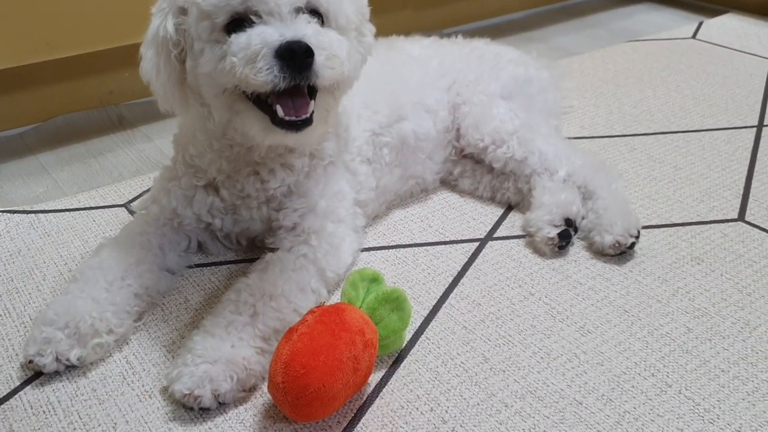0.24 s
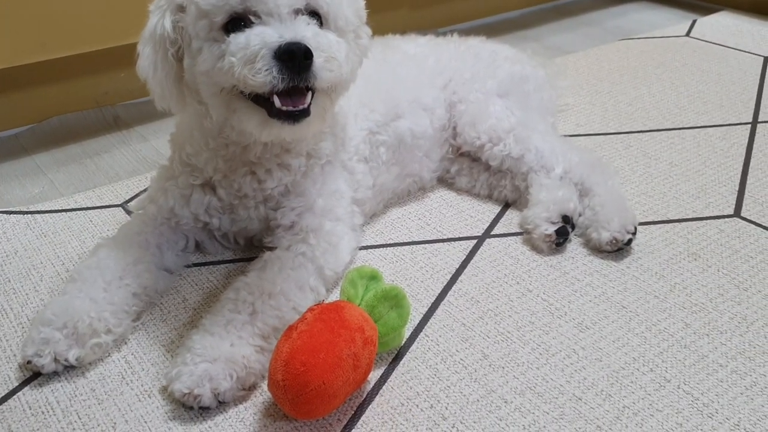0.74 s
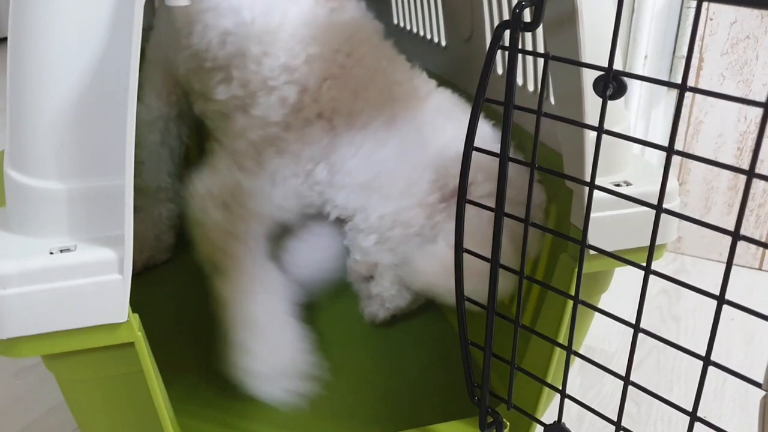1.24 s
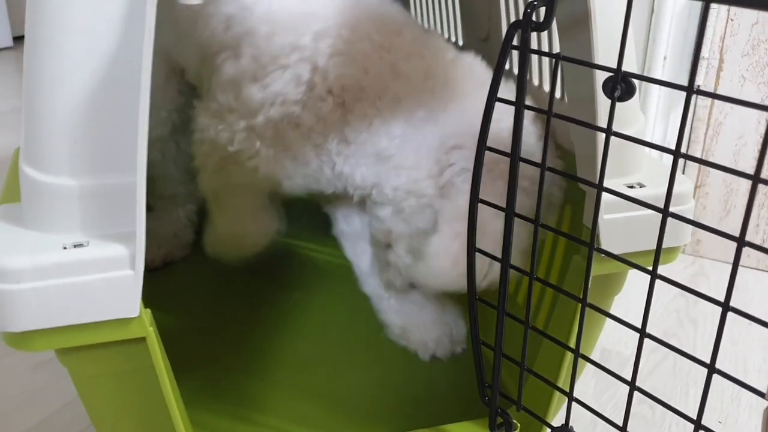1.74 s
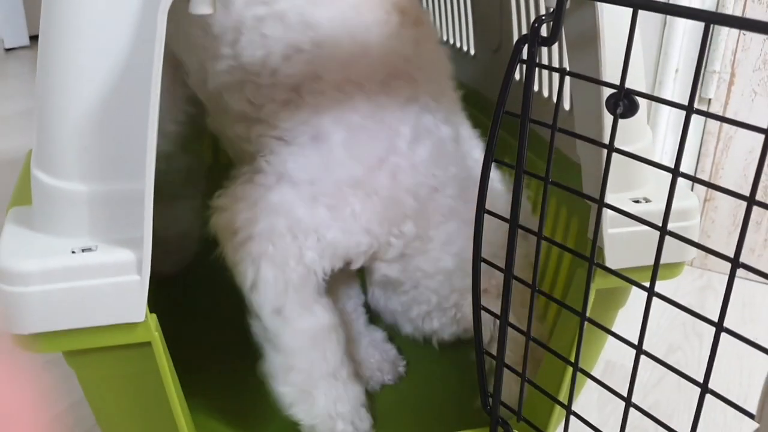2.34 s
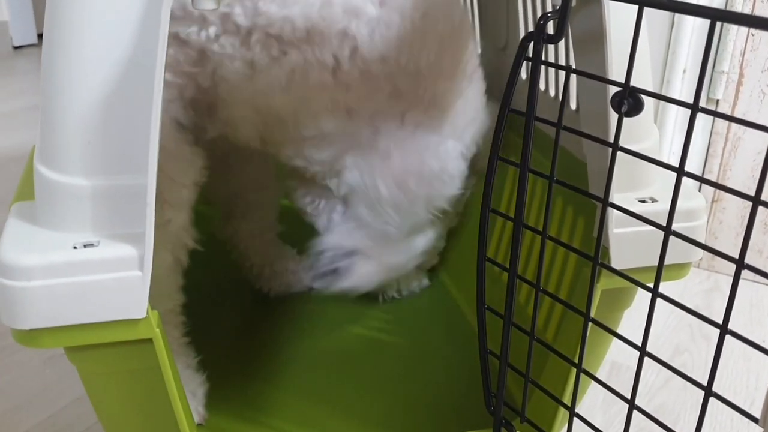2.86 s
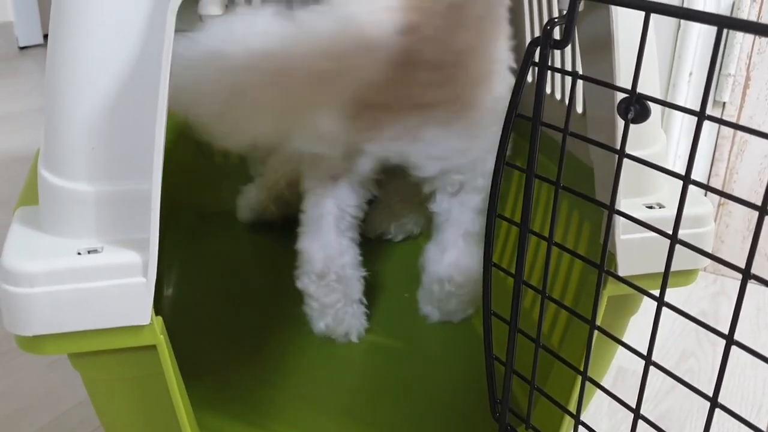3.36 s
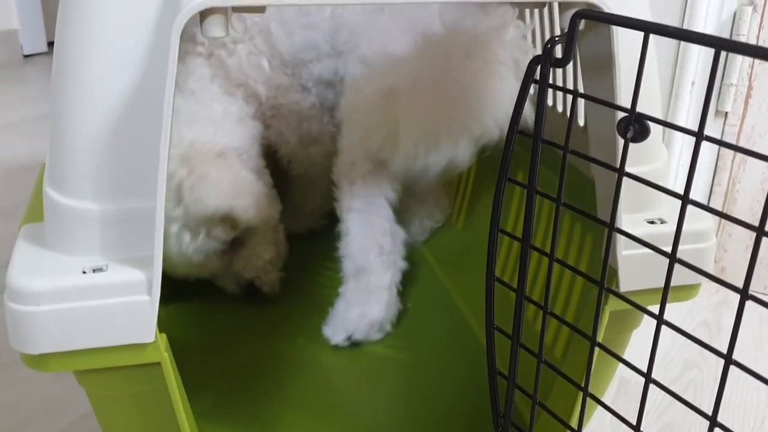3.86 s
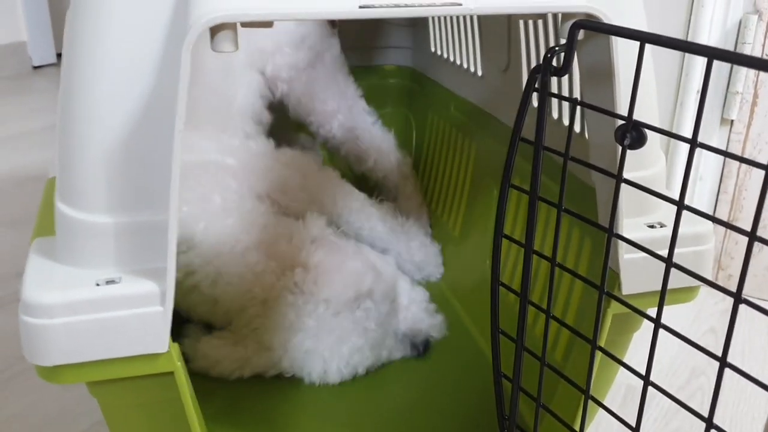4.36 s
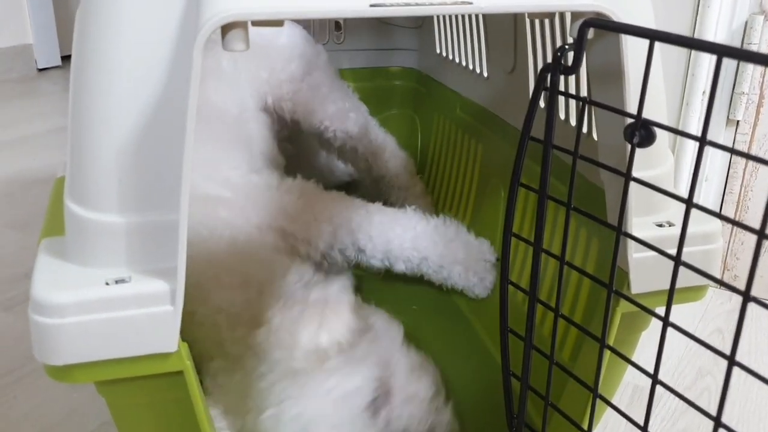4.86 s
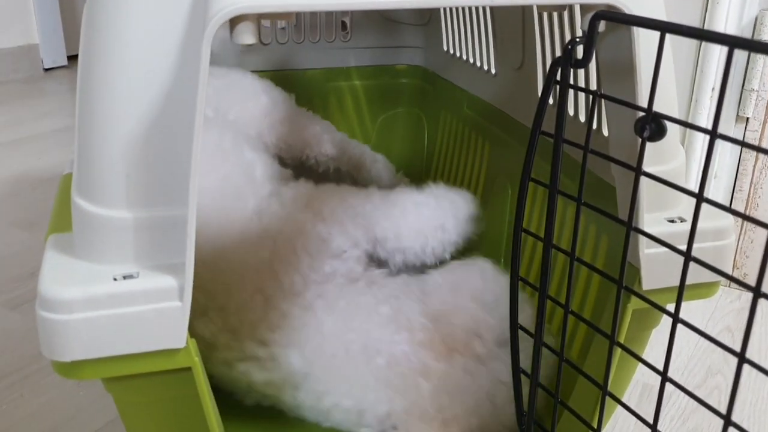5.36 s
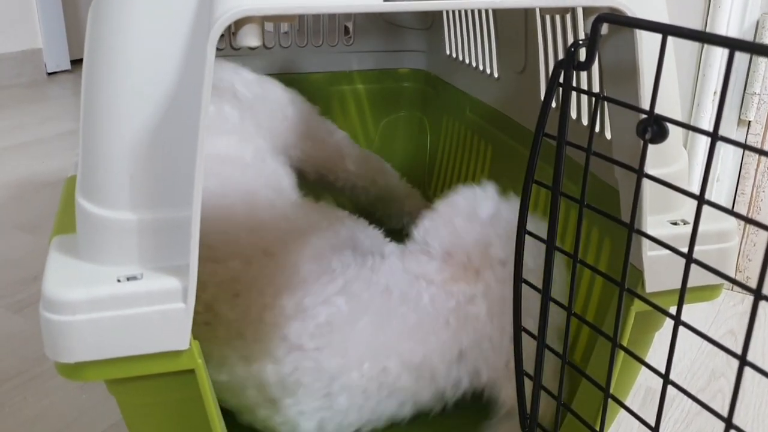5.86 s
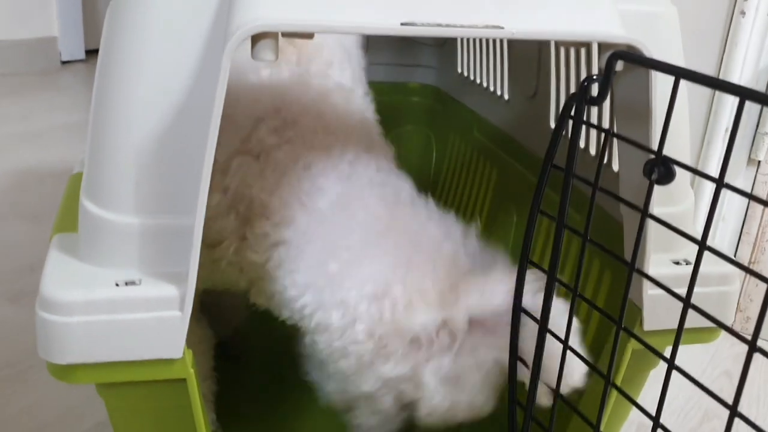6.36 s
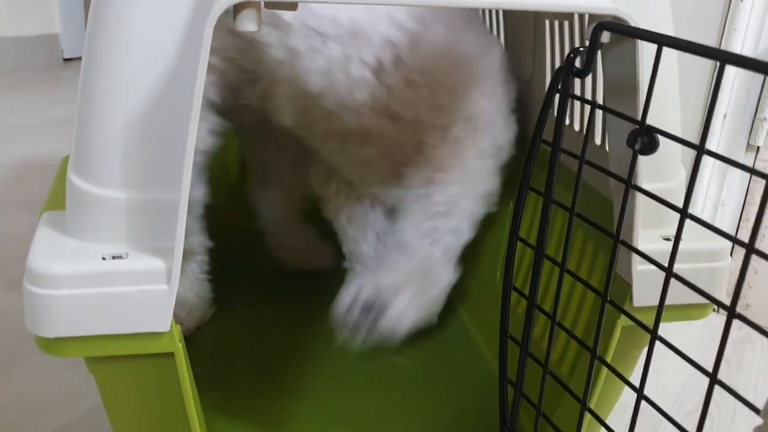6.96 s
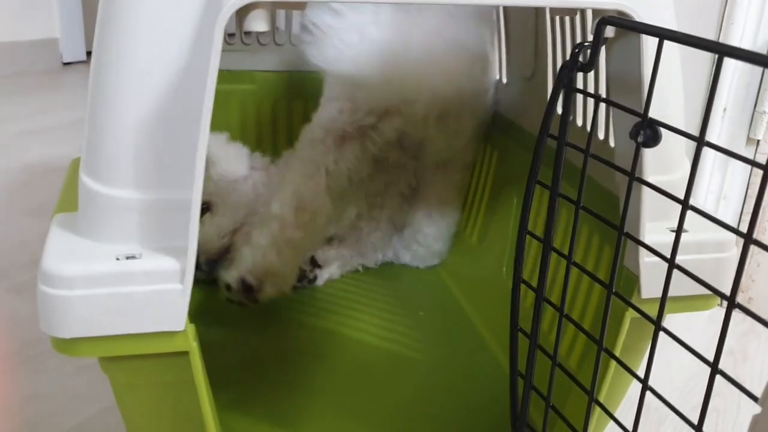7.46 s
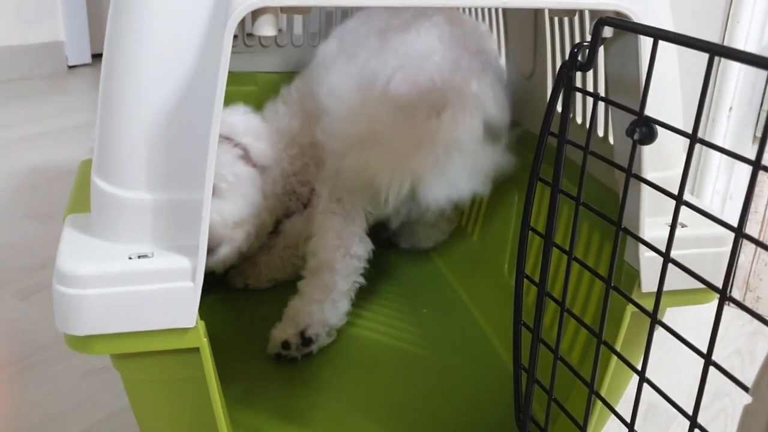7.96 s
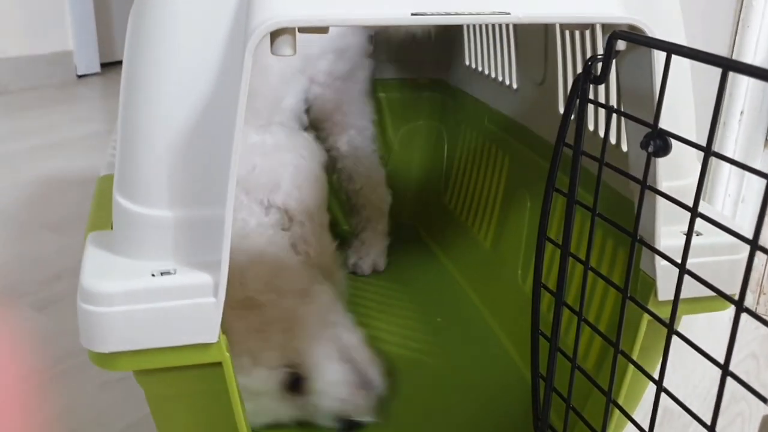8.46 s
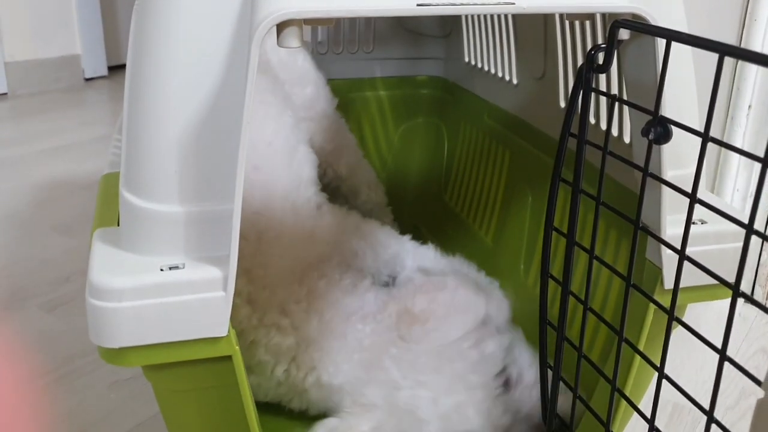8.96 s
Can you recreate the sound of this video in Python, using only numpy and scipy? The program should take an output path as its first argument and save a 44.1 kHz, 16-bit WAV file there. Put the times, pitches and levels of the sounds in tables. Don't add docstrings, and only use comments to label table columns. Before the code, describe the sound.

From 0 to about 0.9 seconds there is only a soft, low, steady indoor hum, which fades to a brief silence. At 1.03 the carrier bursts in, loud and close: a small dog digs at the ribbed plastic floor, roughly one stroke every 0.12 seconds until about 2.4, each a bright claw scratch with a round low paw thump and hollow shell rumble, loudest around 1.8. From 2.5 to 2.9 come strong separate clacks and skids. Between 3 and 5.3 steps grow sparser, with dull taps, a cluster of wall bumps and scraping near 4.2 to 4.3. It is quieter until 6, with fur slides; a hard step and body thump land near 6.7. From 7 to 8 there are rasps, taps and shuffling, then light brushes and a flurry of small claw rasps from 8.6 to 9.2. The room adds a short tail.

```python
import sys
import numpy as np
from scipy import signal
from scipy.fft import rfft, irfft, next_fast_len
from scipy.io import wavfile

SR = 44100
rng = np.random.default_rng(int(sys.argv[2]) if len(sys.argv) > 2 else 0)


def generate_wav(signal):
    frames = np.transpose(np.atleast_2d(signal))
    scaled = np.clip(frames, -1, 1) * 32767
    pcm = np.round(scaled).astype(np.int16)
    wavfile.write(sys.argv[1], SR, pcm)


def invert_db(level):
    return 10 ** (np.asarray(level, dtype=float) / 20)


N = 406161
SIZE = next_fast_len(N + SR)
HZ = np.maximum(np.fft.rfftfreq(SIZE, 1 / SR), 1)

# (f/Hz, level/dB)
CLAW_COLOUR = [(180, -28), (300, 0), (519, -9), (1840, -7), (2250, -5), (2930, -0.5), (3700, -3),
               (6100, -1), (8940, -17.5), (12900, -11), (15200, -26), (16600, -20)]
# (f/Hz, phase/rad)
PORT_PHASE = [(60, 0), (150, .22), (300, .75), (700, 1.0), (1500, 2.1), (2700, 1.3), (15000, 1.6)]
# (t/s, peak level/dB)
DIG_THUMPS = [(1.115, -13.5), (1.2318, -9), (1.289, -20.5), (1.341, -11), (1.454, -12), (1.57, -13.5),
              (1.681, -11.5), (1.81, -7.5), (1.915, -8), (2.034, -9), (2.152, -8), (2.376, -25)]


def rms_one(x):
    return x / np.sqrt(np.mean(x ** 2) + 1e-20)


def in_time(rows):
    s, *columns = np.transpose(rows)
    return [np.interp(np.arange(N) / SR, s, c) for c in columns]


def at_hz(points):
    hz, value = np.transpose(points)
    return np.interp(np.log(HZ), np.log(np.maximum(hz, 1)), value)


def colour(x, spectrum):
    cepstrum = irfft(np.log(invert_db(at_hz(spectrum))), SIZE)
    cepstrum[1:SIZE // 2] *= 2
    cepstrum[SIZE // 2 + 1:] = 0
    return irfft(rfft(x, SIZE) * np.exp(rfft(cepstrum)), SIZE)[..., :N]


def band(x, low_hz, high_hz):
    sos = signal.butter(2, [low_hz, min(high_hz, .45 * SR)], "band", fs=SR, output="sos")
    return signal.sosfilt(sos, x)


def ring(clicks, hz, t60):
    r, w = invert_db(-60 / (t60 * SR)), 2 * np.pi * hz / SR
    return signal.lfilter([0, np.sin(w)], [1, -2 * r * np.cos(w), r * r], clicks + 1e-18)


def drift(rate):
    knots = rng.standard_normal(1000)
    return np.interp(np.arange(N) / SR * rate, np.arange(1000), knots)


def diffuse(length):
    # (f/Hz, correlation)
    likeness = [(60, 0.99), (165, 1.02), (260, 0.6), (550, 0.09), (1650, -0.42), (4970, -0.09),
                (15000, 0.08)]
    mid, side = rfft(rng.standard_normal((2, length)), SIZE)
    alike = np.clip(at_hz(likeness) - .06, 0, 1)
    return np.sqrt(1 + alike) * mid + np.sqrt(1 - alike) * side * [[1], [-1]]


def hum():
    # (f/Hz, level/dB)
    hum_colour = [(12, -76), (20, -41.5), (93, 2.5), (134, -13), (168, -10.5), (204, -13), (328, -16.5),
                  (357, -11), (542, -19), (660, -27), (849, -21), (976, -30.5), (1060, -25), (1330, -30.5),
                  (4000, -46.5), (8000, -63), (16000, -74)]
    # (t/s, level/dB)
    hum_level = [
        (0, -39.5),
        (.75, -38.5),
        (.85, -41),
        (.9, -44.5),
        (.928, -57),
        (1.028, -42.5),
        (9.21, -40),
    ]
    noise = irfft(diffuse(SIZE) * invert_db(at_hz(hum_colour)), SIZE)[:, :N]
    return invert_db(in_time(hum_level)[0]) * rms_one(noise)


def rumble(lumpy_db=3.5):
    # (f/Hz, level/dB)
    rumble_colour = [(15, -58), (25, -22.5), (66, -2), (128, -0.5), (186, -24.5), (224, -1), (378, -22),
                     (574, -39.5), (793, -15), (1000, -26), (1300, -59), (2200, -120)]
    # (t/s, level/dB)
    weight = [(1.03, -34.5), (1.15, -24), (1.3, -26.5), (2.03, -24.5), (2.35, -29.5), (2.6, -47),
              (2.78, -31), (3.2, -44), (3.5, -38.5), (4.0, -34.5), (4.15, -36.5), (4.58, -39), (6.04, -41),
              (6.43, -36), (6.75, -39.5), (7.3, -35), (8.07, -35), (9.21, -38.5)]
    level_db, = in_time(weight)
    shudder = colour(rng.standard_normal(N), rumble_colour)
    return invert_db(level_db - 5.0 + lumpy_db * drift(18)) * rms_one(shudder)


def strikes():
    # (t/s, peak level/dB, struck panel f/Hz, dull knock/dB re peak, sharp edge/dB re peak)
    dig_strokes = [(1.104, -19, 2640, -10, -3.5), (1.1429, -17, 2820, -19, -9), (1.216, -15, 6400, -35, -9),
                   (1.333, -15, 2920, -16, -1.5), (1.44, -15.5, 2600, -26, -10),
                   (1.566, -12.5, 2800, -33, -7), (1.7035, -14, 3160, -13, -9),
                   (1.7937, -7.5, 3070, -16, -13), (1.8975, -9.5, 3480, -13, -22.5),
                   (1.912, -40, 4500, -9, 5), (2.0288, -14.5, 2880, -24, -6.5),
                   (2.1358, -11, 3420, -19, -14), (2.263, -15.5, 4440, -12, -7),
                   (2.3903, -16, 2460, -12, -14), (2.408, -25.5, 3000, -12, -17)]
    # (t/s, peak level/dB, panel f/Hz, knock/dB, edge/dB)
    steps = [(2.5511, -6.5, 2520, -17, -23), (2.6299, -17, 2650, -57, -18), (2.7632, -12, 2900, -30, -9),
             (2.8811, -5.5, 2520, -31, -19.5), (3.2412, -15, 2820, -11, -9.5),
             (3.4069, -18.5, 3220, -16.5, -25.5), (3.7275, -12.5, 1550, -36, -18),
             (4.0066, -13.5, 2420, -14.5, -24.5), (4.3334, -19, 1410, -7.5, -18.5),
             (4.4425, -18, 2740, -13, -11), (4.7867, -19.5, 5800, -8.5, -0.5),
             (5.1163, -22, 4380, -8.5, -2.5), (5.2602, -16, 2900, -62, -11),
             (6.358, -24.5, 2640, -10, -6.5), (6.6547, -8.5, 1020, -11, -18.5),
             (6.6985, -17, 2980, -7.5, -7), (6.9155, -28.5, 3440, -5.5, 1.5), (7.2814, -14, 2420, -51, -12),
             (7.4212, -20, 1580, -8.5, -9), (7.7945, -27.5, 3220, -4, -7),
             (8.3298, -17, 2830, -13.5, -16.5)]
    # (t/s, peak level/dB, panel f/Hz, sharp edge/dB re peak)
    brushes = [(3.0262, -25, 2900, -11.5), (3.4818, -24.5, 4570, -12.5), (3.5032, -23, 2750, -22),
               (3.871, -29, 2550, -26), (4.222, -26, 950, -45), (4.258, -46, 1100, -28),
               (4.624, -33.5, 2740, -11), (4.731, -28, 3420, -13), (5.869, -34, 3640, -34),
               (6.245, -35, 3050, -13.5), (6.5028, -25, 2670, -11.5), (6.5158, -35, 2370, -30),
               (6.604, -24, 1560, -14), (6.807, -22.5, 1500, -16), (3.235, -34, 5000, -11),
               (7.542, -35, 2660, -46.5), (7.905, -29.5, 1710, -17), (8.031, -32.5, 2700, -23),
               (8.284, -39, 1560, -15), (8.488, -32.5, 3050, -8.5), (8.594, -30.5, 2600, -27),
               (8.813, -30, 2700, -14), (8.871, -28, 3100, -11), (8.8895, -23.5, 2820, -34),
               (8.942, -20.5, 2250, -31.5), (8.674, -27, 4570, -25), (9.127, -24.5, 4670, -19)]
    brush_knock_db = -14
    light = [(s, db, hz, brush_knock_db, edge) for s, db, hz, edge in brushes]
    return sorted(list(dig_strokes) + list(steps) + light)


def dragging():
    # (middle t/s, length/s, scrape level/dB, fur hiss/dB re scrape)
    slides = [(1.06, 2, -45.5, 8), (1.4, 0.9, -42.5, 5.5), (2.06, 0.84, -40, 2.5), (2.687, 0.58, -56, 16.5),
              (2.965, 0.25, -58, 5), (3.566, 0.71, -51, -5.5), (4.316, 0.44, -40.5, -7),
              (4.573, 0.24, -70, 24), (4.85, 0.18, -50, -16), (4.953, 0.22, -44.5, -0.5),
              (5.065, 0.34, -51.5, 6), (5.19, 1.03, -57, 3), (5.585, 0.52, -68, -14.5),
              (5.967, 0.16, -46, 0), (6.01, 0.13, -35.5, 2), (6.043, 0.19, -41.5, -8),
              (6.157, .15, -58, -2), (6.209, 0.096, -48, -1.5), (6.371, 0.074, -36.5, -12),
              (6.484, 0.44, -49.5, 2.5), (6.808, 0.42, -48, -24), (7.037, 0.21, -53.5, 14.5),
              (7.125, 0.14, -42.5, -1.5), (7.186, .2, -46.5, -16), (7.373, 0.23, -40.5, -3.5),
              (7.49, 0.15, -40.5, -3), (7.65, 0.21, -45.5, -20), (7.77, 0.1, -48.5, -1),
              (7.982, 0.37, -42.5, -9), (8.52, 1, -52, -13), (8.703, 0.23, -43.5, -3.5),
              (8.79, 0.11, -54, 1), (8.93, 0.74, -48, -27), (9.09, 0.13, -38, 4.5)]
    drag_db, drag_follows = -40.5, 0.88
    drag_hiss_db, drag_hiss_follows = 4, 0.46
    lead_s, rise_s, fade_s = .01, 0.012, 0.072
    rest_db, rest_hiss_db = -68, -12
    fur_air_db, turned_s, turned_air_db = 1.5, 7.25, 7

    t = np.arange(0, N / SR + .01, .002)
    mid, length, slide_db, slide_hiss_db = np.transpose(slides)[..., None]
    swell = invert_db(slide_db) * np.exp(-(2.52 * (t - mid) / length) ** 2)

    s, db, _, _, edge_db = np.transpose(strikes())[..., None]
    after = np.maximum(t - s + lead_s, 0)
    shape = 2 * (1 - np.exp(-after / rise_s)) * np.exp(-after / fade_s)
    tail = invert_db(drag_db + drag_follows * (db + 12.0)) * shape
    tail_hiss = tail * invert_db(drag_hiss_db + drag_hiss_follows * (edge_db + 12.0))

    scrape = np.sum(swell ** 2, axis=0) + np.sum(tail ** 2, axis=0) + invert_db(2 * rest_db)
    fur = np.sum((swell * invert_db(slide_hiss_db)) ** 2, axis=0)
    hiss = fur + np.sum(tail_hiss ** 2, axis=0) + invert_db(2 * (rest_db + rest_hiss_db))
    air_db = fur_air_db * fur / hiss + turned_air_db * (t > turned_s)
    return in_time(np.transpose([t, 10 * np.log10(scrape), 10 * np.log10(hiss / scrape), air_db]))


def drag(scrape_db, hiss_db, air_db, grains_per_s=2500, grain_db=1.5, split_hz=4200, scatter_db=0.5):
    # (f/Hz, level/dB)
    scrape_colour = [(240, -36), (400, -2.5), (579, -6.5), (676, 3.5), (753, -1.5), (1730, -1),
                     (2150, -8.5), (2710, -4), (3810, -13.5), (5520, -12), (8370, -29.5), (11800, -26),
                     (15200, -41), (16000, -51)]
    sizes = invert_db(grain_db * np.minimum(rng.exponential(1, N), 5)) * rng.choice([-1, 1], N)
    clumps = invert_db(3.0 * drift(70) + .8 * drift(22))
    grains = rms_one(sizes * (rng.random(N) < grains_per_s / SR) * clumps)
    scatter = invert_db(scatter_db) * rms_one(clumps) * rng.standard_normal((2, N))
    coloured = colour(ports(grains) + scatter, scrape_colour)
    low, high = band(coloured, 180, split_hz), band(coloured, split_hz, SR)
    airy = rms_one(high + (invert_db(air_db) - 1) * band(high, 6600, SR))
    return invert_db(scrape_db + 1.5) * (rms_one(low) - invert_db(hiss_db - 8.0) * airy)


def lone_ticks(cycles=7.6, ring_db=-10.0, reach=2.82):
    # (t/s, peak level/dB)
    nail_tips = [(1.117, -8), (1.221, -24), (1.229, -8), (1.366, -9), (1.459, -13), (1.704, -7),
                 (1.709, -6), (1.794, -1), (1.798, 2), (1.8977, -0.5), (1.9433, -14), (2.147, -9),
                 (2.2999, -15), (2.3919, -5), (2.3934, -4), (2.56, -8), (2.568, -9), (2.892, -25),
                 (4.796, -15), (5.277, -26), (5.872, -34), (6.341, -34), (6.505, -27), (6.518, -19),
                 (8.227, -37.5), (8.972, -34)]
    # (t/s, peak level/dB, f/Hz)
    taps = [(1.096, -10, 790), (2.015, -16, 776), (2.299, -15.5, 815), (2.41, -22, 1100), (2.655, -55, 830),
            (2.837, -8.5, 1290), (3.926, -17.5, 820), (4.101, -20.5, 705), (4.26, -22, 1030),
            (4.273, -16, 800), (4.335, -28, 805), (4.342, -8.5, 740), (4.692, -24, 830), (4.906, -18, 850),
            (4.973, -16, 1180), (5.396, -24.5, 780), (5.549, -28, 1150), (7.005, -18, 1200),
            (7.11, -21, 720), (7.208, -34, 1390), (7.254, -17, 1090), (7.305, -12, 746), (7.788, -14, 1060),
            (7.843, -23, 795), (7.93, -20.5, 810), (7.989, -16, 725), (8.226, -31, 830), (8.621, -25, 820),
            (8.711, -19.5, 960), (9.063, -39, 745)]
    nail_tip_hz = 2900
    out, click = np.zeros(N + 1000), np.eye(1, 1000)[0]
    for s, db, hz in [(s, db, nail_tip_hz) for s, db in nail_tips] + list(taps):
        at = round(s * SR)
        tap = band(click, 1.15 * hz, reach * hz) + invert_db(ring_db) * ring(click, hz, cycles / hz)
        out[at:at + 1000] += invert_db(db + 1.0) * tap / np.abs(tap).max()
    return colour(out[:N], CLAW_COLOUR)


def claws(ticks_per_s=4000, skid_s=0.0062, softness=0.067, first=0.71,
          panel_cycles=14.0, panel_db=-19.0, second_db=-18):
    rasp_edge_db, rasp_stretch = -34, 1.3
    out, t = np.zeros((4, N + 2000)), np.arange(2000) / SR
    for k, (s, db, hz, knock_db, edge_db) in enumerate(strikes()):
        chance, size = rng.random(2000), rng.standard_normal(2000)
        skid = skid_s * invert_db(-softness * (db + 8.0))
        rasp = np.clip((rasp_edge_db - edge_db) / 6, 0, 1)
        skid *= 1 + rasp_stretch * rasp
        ticks = size * (chance < ticks_per_s / SR) * np.exp(-t / skid)
        ticks *= invert_db(2.2 * np.repeat(size[:20], 100))
        ticks *= 1 - np.exp(-8.5 * t / skid)
        ticks[0] = (1 - rasp) * first * invert_db(softness * (db + 31.0))

        second_hz = 1100 * 2.37 ** chance[0]
        own = invert_db(panel_db) * ring(ticks, hz, panel_cycles / hz)
        neighbour = invert_db(second_db) * ring(ticks, second_hz, panel_cycles / second_hz)
        body = rms_one(band(ticks, 570, 3470) + own + neighbour)
        knock = rms_one(band(ticks, 725, 1124))
        edge = rms_one(band(ticks, 4900, 24750))
        strike = body - invert_db(knock_db + 13.0) * knock - invert_db(edge_db + 7.5) * edge
        at = round(s * SR)
        out[k % 4, at:at + 2000] += invert_db(db - 12.0) * strike
    return colour(out[:, :N], CLAW_COLOUR)


def thumps(contact_s=0.0005, own_cycles=12.3, settle_s=0.00536, reach_db=13.0, push_db=-14.0):
    # (f/Hz, level/dB, t60/s)
    shell_modes = [(87, 4.5, 0.037), (140, 9, 0.017), (240, 1.5, 0.088), (346, -9, 0.079), (420, -4, 0.17),
                   (660, 9.5, 0.03), (820, -11, 0.049)]
    # (t/s, peak level/dB, shell f/Hz)
    wall_bumps = [(2.547, -19.5, 356), (3.244, -25.5, 246), (3.919, -31, 236), (4.1, -27.5, 245),
                  (4.165, -31, 260), (4.192, -13.5, 305), (4.207, -26, 330), (4.254, -13, 333),
                  (4.268, -28, 400), (4.287, -28, 420), (4.33, -22.5, 240), (4.332, -31, 587),
                  (5.118, -29, 300), (6.002, -25.5, 230), (6.658, -15, 232), (7.294, -24.5, 208),
                  (7.42, -24.5, 226), (7.888, -27.5, 203), (7.986, -24.5, 218), (8.599, -27, 153),
                  (9.122, -27, 423)]
    # (t/s, peak level/dB, shell f/Hz)
    body_thumps = [(2.696, -28, 106), (2.836, -26, 111), (3.405, -34, 70), (4.015, -40, 95),
                   (4.19, -32, 62), (4.503, -39, 132), (4.785, -30, 107), (6.004, -26, 62),
                   (6.201, -31, 114), (6.349, -30, 62), (6.53, -23, 81), (6.713, -14, 89),
                   (6.798, -30, 121), (6.916, -30, 97), (7.107, -25.5, 87), (7.364, -22, 94.5),
                   (7.501, -24.5, 93), (7.784, -40, 89), (8.418, -30, 89), (8.554, -28, 120),
                   (8.806, -40, 87), (8.92, -37, 62)]
    dig_floor_hz, dig_shell_db = 132, -4.5
    digs = [(s, db + dig_shell_db, dig_floor_hz) for s, db in DIG_THUMPS]
    rows = np.array(sorted(digs + list(wall_bumps) + list(body_thumps)))
    out = np.zeros(N + SR)
    at = ((rows[:, 0] + settle_s) * SR).astype(int)
    for i, (s, db, hz) in zip(at, rows):
        click = np.zeros(SR // 4)
        click[0] = invert_db(db - 1.5)
        bump = np.hanning(int(.45 * SR / hz))
        puff = ring(click, hz, own_cycles / hz)
        puff[:len(bump)] += invert_db(db + push_db) * bump
        out[i:i + SR // 4] += band(puff, 0.52 * hz, 10.0 * hz)

    spread_db = rng.normal(0, 0.41, (len(rows), len(shell_modes)))
    for k, (hz, level_db, t60) in enumerate(shell_modes):
        clicks = np.zeros(N + SR)
        octaves_off = np.abs(np.log2(hz / rows[:, 2]))
        clicks[at] = invert_db(rows[:, 1] + level_db + spread_db[:, k] - reach_db * octaves_off)
        out += band(ring(clicks, hz, t60), 1.035 * hz, 16000)
    return band(out[:N], 50.0, 1 / contact_s)


def pounds(pad_s=0.006, peak_s=0.00737, rebound_s=0.01443, rebound_db=-1.5,
           floor_hz=72, floor_db=-24.5, floor_t60=0.14):
    s, db = np.transpose(DIG_THUMPS)
    clicks = np.zeros(N)
    clicks[((s + peak_s - pad_s / 2) * SR).astype(int)] = invert_db(db + 3.0)
    pad = np.hanning(int(pad_s * SR))
    rebound = invert_db(rebound_db) * np.roll(clicks, int(rebound_s * SR))
    push = signal.lfilter(pad, 1, clicks + rebound)
    floor_hum = signal.lfilter(pad / pad.sum(), 1, ring(clicks, floor_hz, floor_t60))
    return band(push + invert_db(floor_db) * floor_hum, 80.0, 800)


def snaps(low_hz=450, wet_db=-5.0):
    # (t/s, peak level/dB)
    slips = [(2.552, 4), (2.88, 1.5), (3.4068, -17), (3.408, -11), (3.484, -26), (6.341, -34), (6.52, -17),
             (8.331, -14), (7.0052, -19), (7.1984, -28), (7.2075, -31), (7.2315, -44), (7.254, -21),
             (7.277, -15), (7.546, -22), (7.659, -42), (7.907, -38), (7.932, -26), (6.6996, -12),
             (6.916, -25), (4.445, -9), (2.266, 3.5), (2.392, -8), (2.409, -8), (1.339, -17), (8.814, -40),
             (8.891, -19), (9.02, -19)]
    out = np.zeros(N)
    for s, db in slips:
        out[round(s * SR)] = invert_db(db + 6.0)
    out = colour(band(out, low_hz, SR), CLAW_COLOUR)
    return out, invert_db(wet_db) * out


def rasps(rows, catches_per_s=1500, cycles=33.0, plain_db=-16.5, rise=0.13):
    out = np.zeros(N + 6000)
    for s, length, db, hz in rows:
        chance, size = rng.random(6000), rng.standard_normal(6000)
        length = min(length, .1)
        part = np.arange(6000) / SR / length
        swell = np.clip(np.minimum(part / rise, (1 - part) / (1 - rise) + .5), 0, 1)
        catches = size * (chance < catches_per_s / SR) * swell
        panel = rms_one(ring(catches, hz, cycles / hz))
        scratch = rms_one(band(catches, 0.19 * hz, 0.6 * hz))
        at = round(s * SR)
        out[at:at + 6000] += invert_db(db) * np.sqrt(length * SR / 6000) * (panel + invert_db(plain_db) * scratch)
    return out[:N]


def ports(x):
    half = np.exp(.5j * at_hz(PORT_PHASE))
    return irfft(rfft(x, SIZE) * [half, 1 / half], SIZE)[:, :N]


def from_spots(spots):
    # (share of the phase gap, left-right level/dB)
    angles = [(0.91, -0.5), (1, 0.5), (0.77, 0), (0.99, -0.4)]
    out = 0
    for x, (share, pan_db) in zip(spots, angles):
        lean = invert_db(pan_db / 2 * np.clip(HZ / 1500, 0, 1))
        half = np.exp(.5j * share * at_hz(PORT_PHASE)) * lean
        out = out + rfft(x, SIZE) * [half, 1 / half]
    return irfft(out, SIZE)[:, :N]


def room(spots):
    t60_s, treble_t60_s, build_s, room_db = 0.28, 0.25, .007, -3
    t, out = np.arange(SR) / SR, 0
    noise = irfft(diffuse(SIZE), SIZE)
    high_pass = signal.butter(1, 4200, "high", fs=SR, output="sos")
    for k, x in enumerate(spots):
        part = noise[:, k * SR:(k + 1) * SR] * (1 - np.exp(-t / build_s))
        treble = signal.sosfilt(high_pass, part)
        tail = (part - treble) * invert_db(-60 * t / t60_s) + treble * invert_db(-60 * t / treble_t60_s)
        out = out + rfft(x, SIZE) * rfft(tail / np.sqrt(np.sum(tail ** 2) / 2), SIZE)
    return invert_db(room_db) * irfft(out, SIZE)[:, :N]


def scene():
    # (t/s, length/s, level/dB, f/Hz)
    rib_rasps = [(2.598, 0.053, -54, 1180), (2.682, 0.041, -58, 1000), (7.025, 0.15, -46, 5660),
                 (7.049, 0.061, -50, 11500), (7.09, 0.046, -59, 5430), (7.29, 0.041, -40, 1080),
                 (5.002, .08, -52.5, 5640), (5.0, .06, -64, 2600), (4.374, 0.04, -43, 1700),
                 (7.03, 0.12, -49, 2830), (8.667, 0.027, -32, 3100), (8.673, 0.032, -36, 2520),
                 (8.707, 0.014, -36, 1760), (8.807, 0.031, -39, 795), (8.935, 0.033, -36, 2400),
                 (8.97, 0.019, -38, 2500), (8.921, 0.0079, -40.5, 760), (8.993, 0.02, -41, 3120),
                 (9.063, 0.026, -38.5, 755), (9.077, 0.017, -31, 2710), (9.081, 0.013, -31, 3240),
                 (9.117, 0.039, -32, 3130), (9.126, 0.049, -37.5, 2470), (9.149, 0.023, -43, 3130)]
    # (t/s, length/s, level/dB, f/Hz)
    dry_rasps = [(1.6965, .005, -24, 3020), (6.6985, 0.0059, -26.5, 3000), (6.6985, 0.0043, -23, 5860),
                 (4.443, 0.0042, -25, 2800), (2.062, .045, -38, 2900), (2.177, 0.036, -32, 3000),
                 (2.762, 0.017, -29, 2900), (2.882, .02, -23.5, 2730), (7.04, 0.036, -43.5, 2800),
                 (2.408, 0.0036, -32, 3000), (2.56, .04, -30, 2900), (2.655, 0.026, -46, 1000),
                 (4.226, 0.025, -40, 1020), (4.259, 0.017, -36, 990), (4.332, 0.024, -32.5, 845),
                 (4.434, .012, -31, 2700), (5.12, 0.028, -45, 1160), (5.12, 0.036, -40, 563),
                 (5.925, 0.037, -49.5, 5700), (5.93, 0.078, -46.5, 3070), (6.0, .03, -41, 895),
                 (6.36, 0.024, -37.5, 377), (6.656, 0.018, -34, 1400), (7.12, 0.069, -56, 2710),
                 (7.79, .03, -38, 1190), (7.99, 0.031, -38, 587), (8.0, 0.023, -47, 970)]
    # (t/s, left-right level/dB)
    pan = [
        (0, -0.1),
        (2.3, 1.3),
        (3, -1.4),
        (5, -1.5),
        (5.6, -1.2),
        (6.6, -1.2),
        (7.5, -.3),
        (9.21, -0.2),
    ]
    hum_stops_s, carrier_s = .93, 1.027
    thump_room_db, pound_room_db, rasp_room_db = -1.5, -7, -5

    spots, shell = claws(), -thumps()
    spots[1] += lone_ticks()
    rasp = rasps(rib_rasps)
    snap, snap_wet = snaps()
    first_spot, last_spot = [1, 0, 0, 0], [0, 0, 0, 1]
    low, pound = np.outer(first_spot, shell), np.outer(first_spot, pounds())
    on_floor = spots + low + pound + np.outer(first_spot, rumble())
    close = from_spots(on_floor) + drag(*dragging()) + ports(snap + rasp)

    to_room = spots + invert_db(thump_room_db) * low + invert_db(pound_room_db) * pound
    to_room += np.outer(last_spot, snap_wet + invert_db(rasp_room_db) * rasp)
    carrier = close + room(to_room) + ports(rasps(dry_rasps))

    t = np.arange(N) / SR
    floor = hum() * ((t < hum_stops_s) | (t >= carrier_s))
    heard = carrier * (t >= carrier_s) + floor
    return heard * invert_db(in_time(pan)[0] * [[.5], [-.5]])


def band_limit(x):
    return signal.sosfilt(signal.butter(12, 16620, fs=SR, output="sos"), x)


def record(dry):
    # (f/Hz, left-right level/dB)
    port_balance = [(60, 0.0), (110, -0.5), (200, -2.0), (380, -1.0), (700, 0.0), (1290, 0.0), (2380, -4.0),
                    (4400, -5.5), (7000, -2.0), (9000, 3.5), (15000, 5.0)]
    half = invert_db(at_hz(port_balance) / 2)
    heard = irfft(rfft(dry, SIZE) * [half, 1 / half], SIZE)[:, :N]
    overloaded = 1.205 * np.tanh(heard / 1.211)
    top_cut = signal.cheby2(10, 60, 16700, fs=SR, output="sos")
    return band_limit(signal.sosfilt(top_cut, overloaded))


dry = scene()
out = record(dry)
generate_wav(out)
```